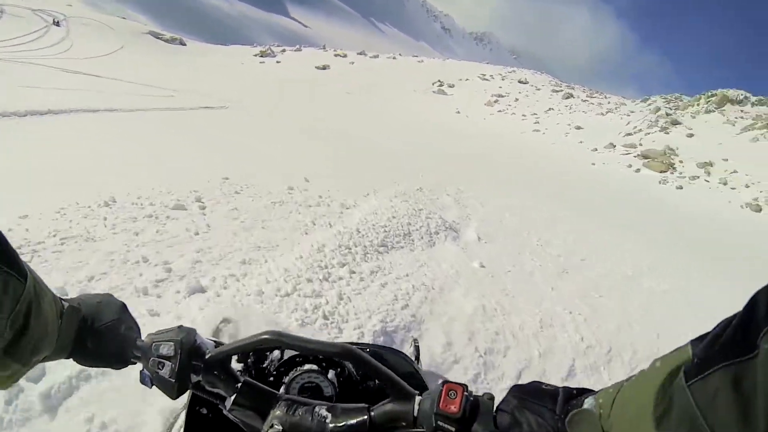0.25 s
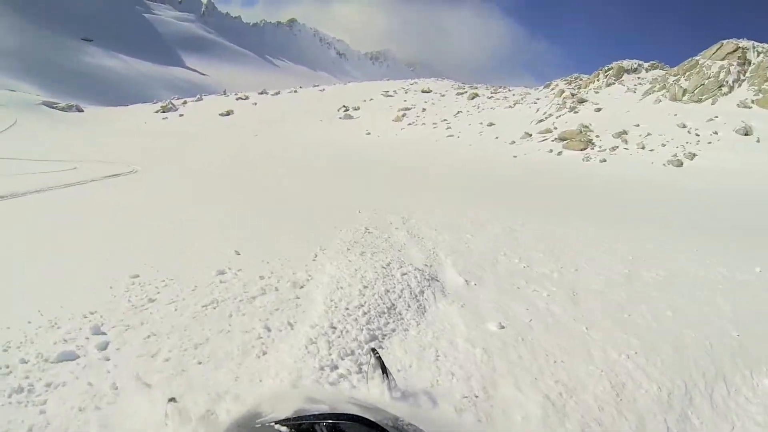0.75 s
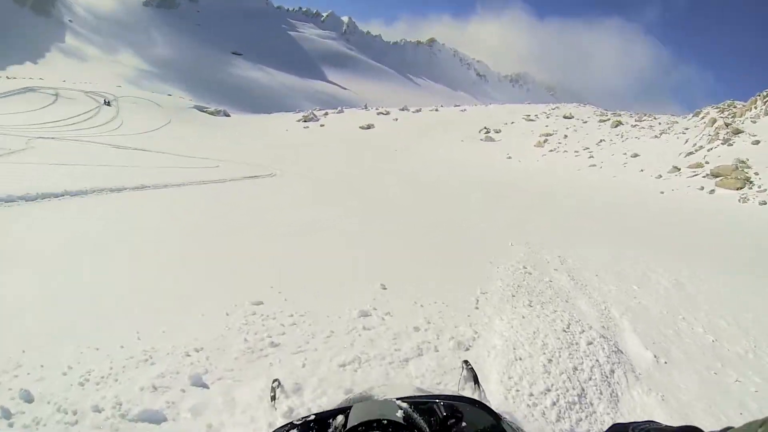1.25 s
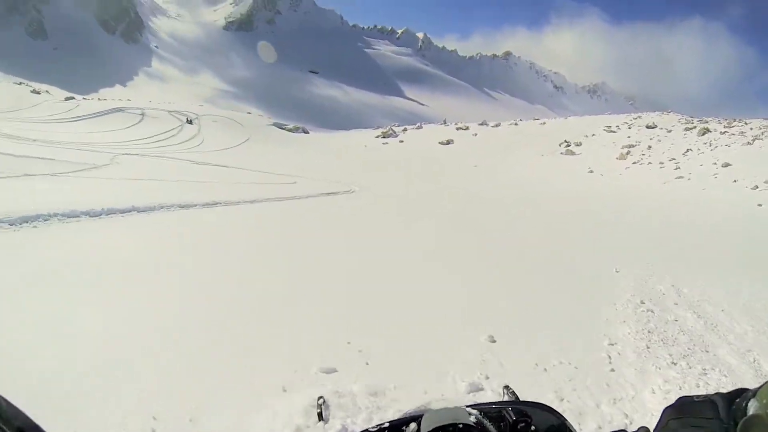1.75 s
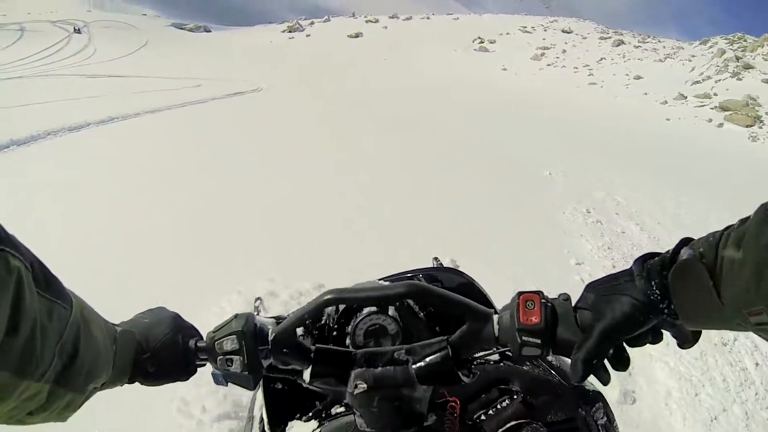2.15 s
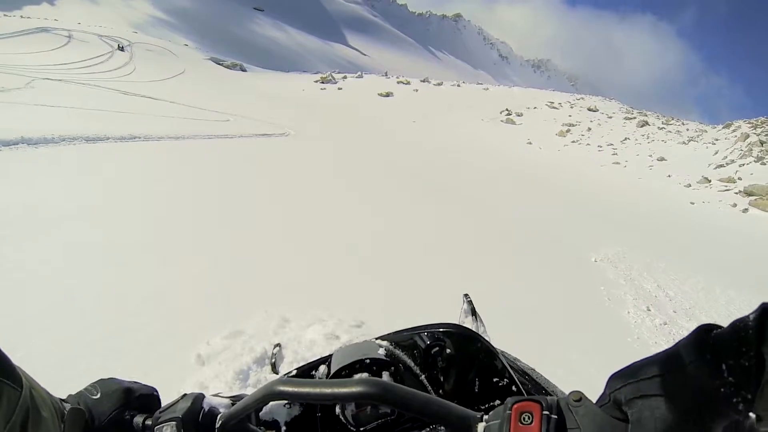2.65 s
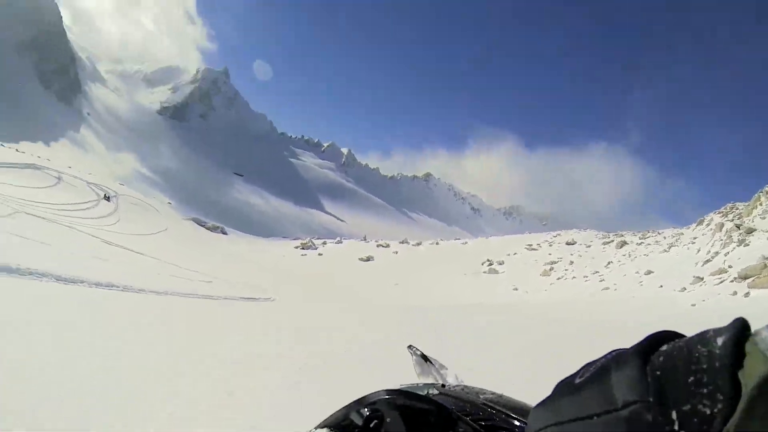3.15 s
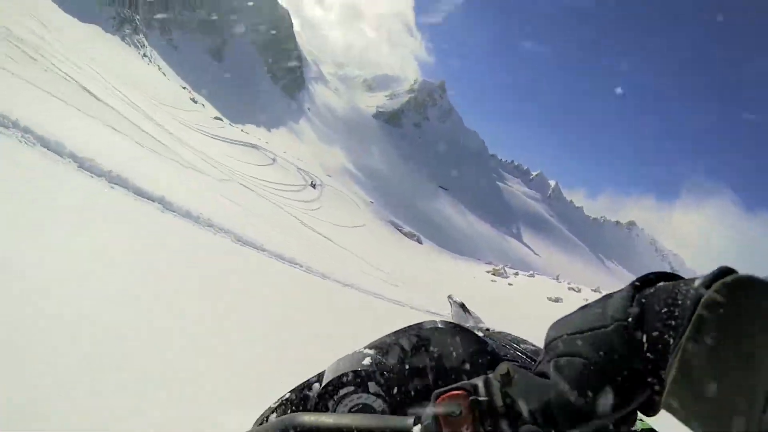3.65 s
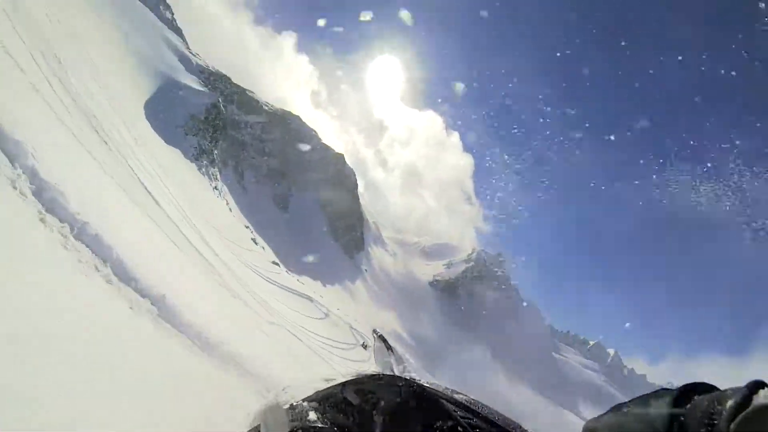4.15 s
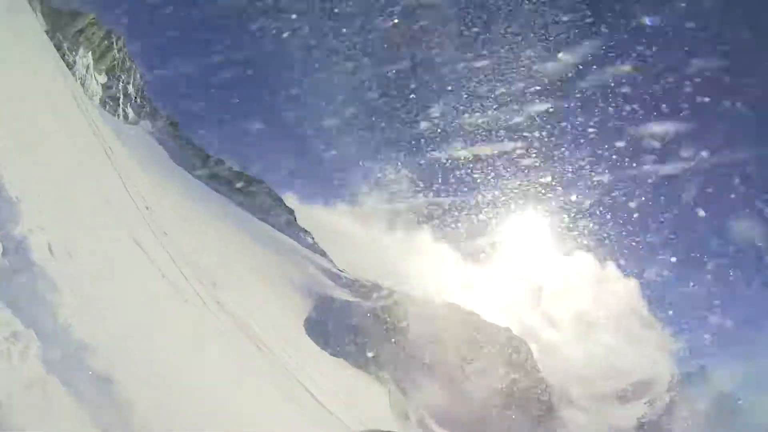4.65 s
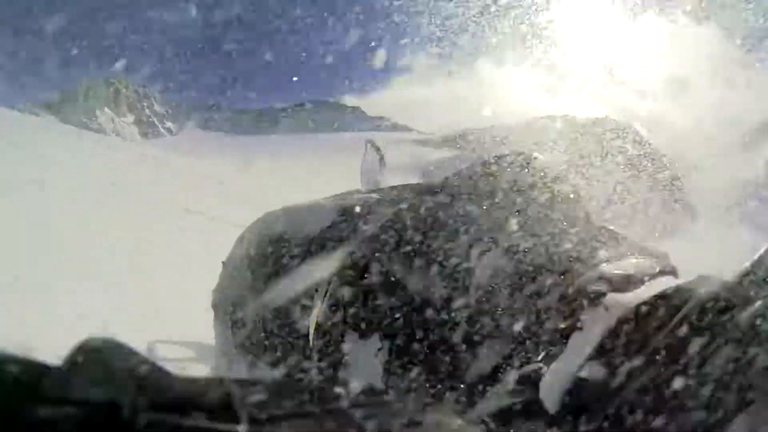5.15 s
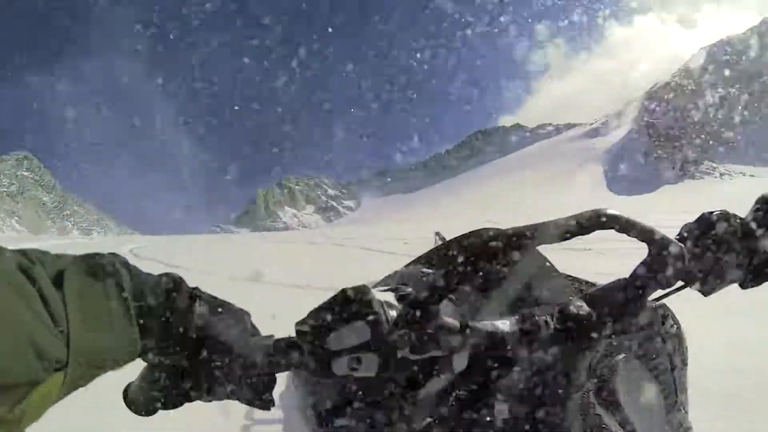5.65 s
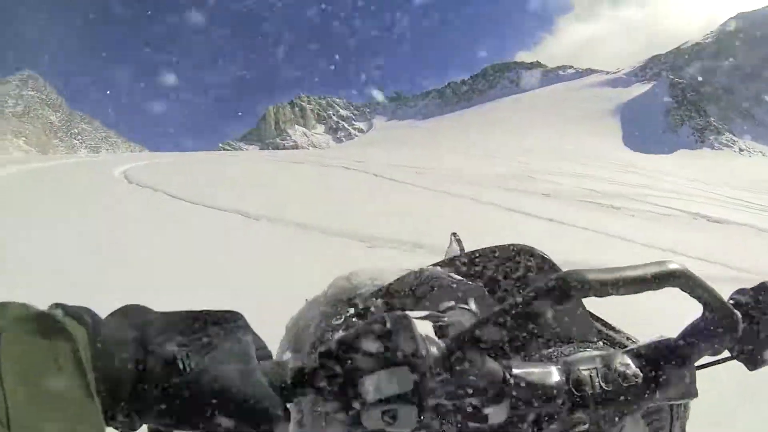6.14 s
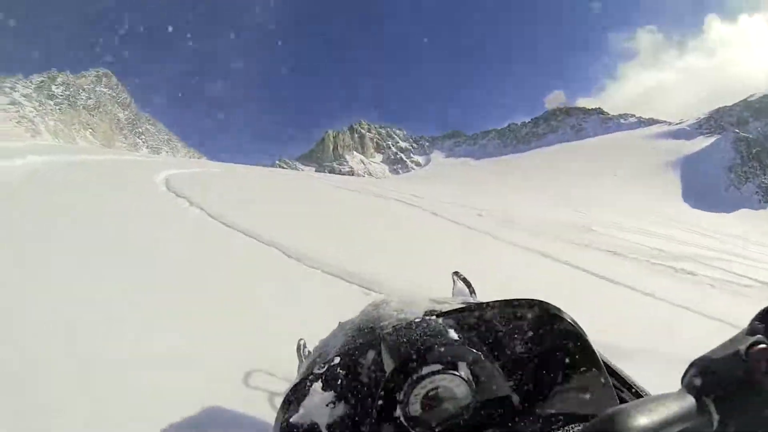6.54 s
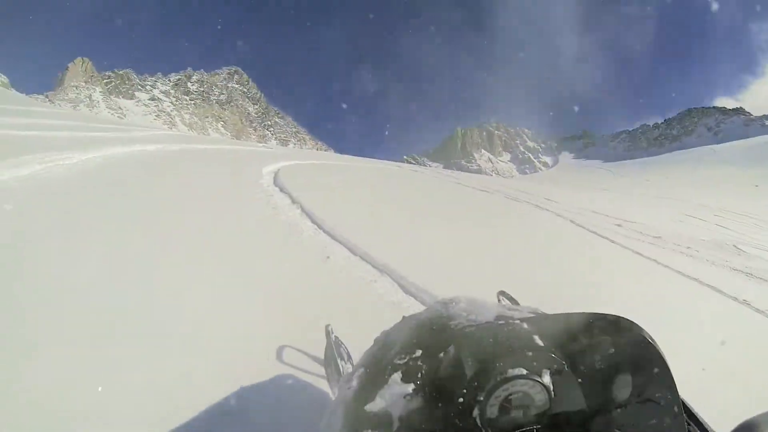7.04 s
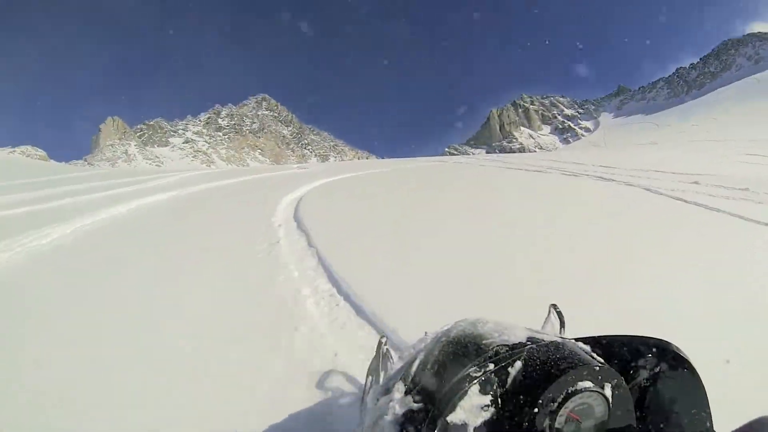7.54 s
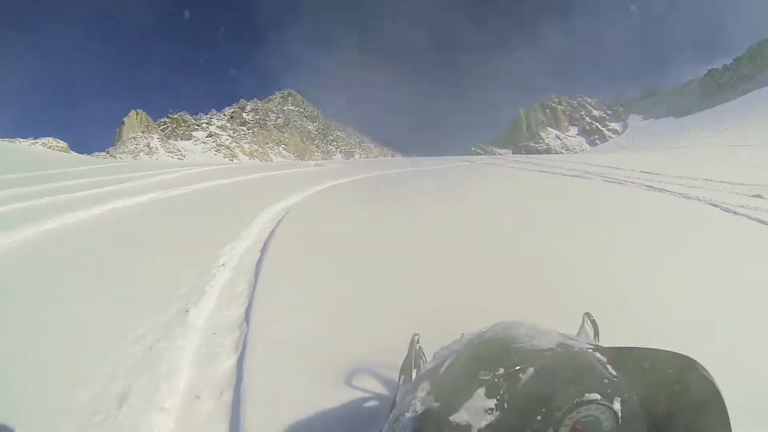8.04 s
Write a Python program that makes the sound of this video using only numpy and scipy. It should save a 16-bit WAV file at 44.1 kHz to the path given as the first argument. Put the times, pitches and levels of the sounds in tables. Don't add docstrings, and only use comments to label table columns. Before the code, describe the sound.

From 0 to 2.4 s a two-stroke twin idles quietly, an uneven low putter near 30 crank turns a second, beneath lumpy wind rumble. Dull knocks, faint glove rustle and small plastic clicks punctuate it, bunching at 2.0-2.36 s with a heavy thump at the end. At about 2.45 s the throttle opens; revs race upward until 3.3 s, sweeping through a boxy resonance near 1.5 kHz, with sharp hollow slaps around 2.8-2.9 s. Afterwards a loud, nasal, buzzing howl holds at high revs, sagging slightly near 5.7 s, then creeping up again. Fine snow hiss and spitting lumps thicken around 4.6-5.1 s, with breathy wind whistle and hollow slaps at 4.5-5.2 and 6.5-7 s. Low bumps land near 4.1-4.4, 5.1 and 5.5 s; track hum grows more present by 5.9 s. The close, sealed microphone softly overloads; the howl continues until an abrupt end at 8.3 s.

```python
import sys
import numpy as np
from scipy import signal
from scipy.io import wavfile
from scipy.ndimage import uniform_filter1d

SR = 44100
rng = np.random.default_rng(int(sys.argv[2]) if len(sys.argv) > 2 else 0)


def field_ratio(decibels):
    return 10 ** (np.asarray(decibels, dtype=float) / 20)


def int16_out(signal):
    q = np.round(np.clip(np.atleast_2d(signal).T, -1, 1) * 32767)
    wavfile.write(sys.argv[1], SR, q.astype(np.int16))


N = 365588
LOADED = np.clip((np.arange(N) / SR - 2.42) / 0.09063, 0, 1)


def evened(x):
    return x / np.sqrt(np.mean(x ** 2) + 1e-20)


def read(points, hz):
    f, value = np.transpose(points)
    return np.interp(np.log(hz + 1), np.log(f + 1), value)


def curves(rows):
    s, *columns = np.transpose(rows)
    return [np.interp(np.arange(N) / SR, s, c) for c in columns]


def wander(hz):
    coarse = rng.standard_normal(N // 64 + 2)
    smooth = signal.sosfiltfilt(signal.butter(2, hz, fs=SR / 64, output="sos"), coarse)
    return np.interp(np.arange(N) / 64, np.arange(len(coarse)), np.clip(evened(smooth), -2.5, 2.5))


def arches(rows, power):
    t = np.arange(N) / SR
    return sum(field_ratio(db) * np.sin(np.pi * np.clip((t - s) / length, 0, 1)) ** power for s, length, db in rows)


def colour(x, db_of):
    log_gain = np.log(field_ratio(db_of(abs(np.fft.fftfreq(8192, 1 / SR)))))
    response = np.fft.ifft(np.exp(np.conj(signal.hilbert(log_gain)))).real
    taps = response[:4096] * np.hanning(8192)[4096:]
    return signal.oaconvolve(x, taps / np.linalg.norm(taps))[:N]


def add(mix, s, sound):
    part = mix[round(s * SR):][:len(sound)]
    part += sound[:len(part)]


# pitch_hz, width_hz, level_db
CAVITY = [(1612, 255, -1), (1374, 360, -8.5), (2545, 580, -18), (3132, 500, -17.5), (4630, 350, -32),
          (5600, 640, -33), (7640, 470, -34), (10300, 1200, -48)]
# pitch_hz, level_db
SHELL = [(60, -54), (200, -11.5), (450, -22), (700, -20), (2000, -25), (4000, -33), (8000, -38),
         (12000, -69), (15000, -62)]


def housing(hz):
    modes = sum(field_ratio(2 * db) / (1 + (2 * (hz - f) / width) ** 2) ** 2 for f, width, db in CAVITY)
    return 10 * np.log10(modes + field_ratio(2 * read(SHELL, hz)))


# pitch_hz, level_db (per Hz)
GUST = [(7.1, -54), (12, 4.5), (32, -1.5), (75, -6.5), (115, -6.5), (133, -7), (152, -4), (216, -22),
        (400, -31), (520, -62), (880, -120)]
# start_s, length_s, level_db
GUSTS = [(.08, 0.44, -32.5), (1.17, .12, -32), (1.98, 0.46, -23), (2.96, 0.33, -23.5), (3.33, 0.23, -23.5),
         (3.75, 0.19, -25), (3.92, 0.1698, -24), (4.05, 0.61, -27.5), (4.5, 0.74, -29.5), (4.97, 0.18, -23),
         (5.38, 0.22, -21), (6.08, 0.1, -24), (6.35, 0.27, -31.5)]
LULL_DB, LULL_DB_PER_S = -30, -0.54


def wind():
    t = np.arange(N) / SR
    lumps = field_ratio(3.0 * wander(9.6))
    rumble = colour(lumps * rng.standard_normal(N),
                    lambda hz: read(GUST, hz) - 7.26 * np.log2(1 + (hz / 90) ** 4))
    roar_tone = [(40, -33.0), (100, -2.0), (200, -14.0), (500, -26.0), (1500, -38), (6000, -110)]  # (Hz, dB)
    roar = colour(lumps * rng.standard_normal(N), lambda hz: read(roar_tone, hz))
    blowing = np.hypot(field_ratio(LULL_DB + LULL_DB_PER_S * t), arches(GUSTS, power=0.35))
    roar_db = -8.5 - 1.4 * LOADED + 6.1 * np.exp(-t / 0.098)
    return blowing * (evened(rumble) + field_ratio(roar_db) * evened(roar))


# start_s, length_s, level_db
VENT = [
    (2.62, 0.37, -23.5),
    (4.1, 1.76, -28),
    (6.3, 0.96, -22),
]
VENT_CALM_DB = -49


def vent():
    air = field_ratio(2.0 * wander(45)) * rng.standard_normal(N)
    whistle = colour(air, lambda hz: -20 * np.log10(1 + ((hz - 1670) / 110) ** 2))
    return LOADED * np.hypot(field_ratio(VENT_CALM_DB), arches(VENT, power=1.0)) * evened(whistle)


# start_s, peak_db, pitch_hz
SLAPS = [(0.084, -31, 1450), (.112, -35, 1700), (.598, -34, 1580), (1.175, -35, 1630), (1.279, -30, 1636),
         (1.448, -31, 1637), (1.544, -30, 1640), (1.579, -40, 1615), (1.621, -29.5, 1640),
         (1.678, -31, 1650), (1.725, -30, 1637), (1.821, -35, 1624), (1.999, -29, 1626), (2.074, -29, 1603),
         (2.679, -25, 1690), (2.765, -20, 1600), (2.776, -13, 1660), (2.892, -7.5, 1524), (2.903, -9, 1530),
         (4.518, -11, 1700), (4.611, -6.5, 1720), (4.638, -14, 1770), (4.676, -9, 1720), (4.707, -12, 1610),
         (4.74, -11, 1705), (4.824, -21, 1660), (5.028, -9, 1675), (5.21, -11, 1690), (6.565, -9, 1625),
         (6.59, -11, 1680), (6.616, -6.5, 1630), (6.659, -8, 1627), (6.682, -15, 1660), (6.707, -10, 1610),
         (6.952, -19, 1630), (6.99, -10, 1624)]
SLAP_RISE_S, SLAP_T60_S = 0.0019, 0.063


def slaps():
    out, t = np.zeros(N), np.arange(3000) / SR
    rise = np.sin(np.pi / 2 * np.minimum(t / SLAP_RISE_S, 1)) ** 2
    shape = rise * field_ratio(-60 * np.maximum(t - SLAP_RISE_S, 0) / SLAP_T60_S)
    for s, db, hz in SLAPS:
        add(out, s, field_ratio(db) * shape * np.sin(2 * np.pi * hz * t))
    return out


# start_s, peak_db, pitch_hz, length_cycles, push (above 0) or pull (below 0)
KNOCKS = [(.103, -29.5, 200, 4, 1), (.222, -22, 140, 1.7, -1), (.288, -20.5, 100, 1.5, 1),
          (.325, -14, 40, 1.8, -1), (.452, -17, 38.16, 1.3, -1.1), (.098, -17.5, 23.7, 1.26, 1.2),
          (.145, -18, 25, 1, 1.2), (0.156, -22, 170, 1.2, -1), (1.176, -20, 120.6, 1.17, 1.45),
          (4.1, -16.5, 47.3, 3.8, 1), (4.299, -15, 44, 5.9, 0.94), (4.42, -16, 51.96, 4.4, 0.9),
          (1.732, -19.5, 109, 0.63, 1.4), (1.909, -17, 219, 0.78, -1.3), (0.236, -16, 31.6, 0.87, -1.7),
          (0.395, -14, 45.6, 0.82, 1.2), (0.882, -28, 90, 0.62, 1.2), (1.222, -21, 79.6, 0.45, -1.9),
          (1.399, -26, 51.53, 0.66, -1.2), (1.728, -9, 56, 1.1, 0.15), (1.908, -10, 51.07, 0.66, -0.5),
          (2.052, -12.5, 40.1, 1.04, 1), (2.131, -16, 101, 1.5, 0.94), (2.359, -2, 99, 1.12, 0.71),
          (5.088, -8.5, 50.4, 2, 0.71), (5.468, -7.5, 32.7, 1.5, 1)]
SWING_DB, SWING_HZ, SWING_T60_S = -18, 46, 0.15


def knocks():
    t = np.arange(N) / SR
    out = field_ratio(SWING_DB - 60 * np.minimum(t / SWING_T60_S, 5)) * np.cos(2 * np.pi * SWING_HZ * t)
    for s, db, hz, cycles, push in KNOCKS:
        turn = np.arange(int(SR * cycles / hz)) / SR * hz
        swell = np.sin(np.pi * turn / cycles) ** 0.85
        add(out, s, push * field_ratio(db) * np.sin(2 * np.pi * turn) * swell)
    return out


# start_s, peak_db, body_db, bright_db (shares of the click)
TICKS = [(0.076, -43, 11, -15), (.1544, -50, 10, -13), (.7205, -49, -8, -8), (1.178, -45, 11, -19),
         (1.2543, -36, 3, -18), (1.4484, -50, 0, -20), (1.492, -29.5, 6, -16), (1.5814, -41, 11, -25),
         (1.908, -31.5, 8, -33), (2.058, -43, 9, -28), (2.089, -38, 7, -11), (2.07, -31, 7.5, -24),
         (2.117, -29.5, -2, -15), (2.1927, -25, 11, -34), (2.2283, -40, 5, -19), (2.2425, -30.5, -1, -1),
         (2.2567, -34, 2, -9), (2.2933, -32, -5, -1), (2.3, -42, 0, 1), (2.3105, -45, -4, 3),
         (2.3206, -40, -5, 6), (2.331, -45, -2, 0), (2.3414, -43, -6, -2), (2.36, -29, -11, -3),
         (2.775, -32, 8, -15), (.657, -47, -6, -8), (2.03, -42, 2, -14), (2.249, -42, -3, 0),
         (2.296, -35, -2, 2), (2.316, -44, -3, 2), (4.6665, -24, -2, -7)]
# start_s, peak_db
LUMPS = [(3.6994, -36), (3.8494, -42), (4.6064, -26), (4.6658, -24), (4.7671, -34), (4.87, -33), (4.9, -32),
         (5.03, -32), (5.0744, -45), (5.3887, -31)]


def ticks():
    out, t = np.zeros(N), np.arange(900) / SR
    soft = 1 - np.exp(-t / .00025)

    def ring(hz, db, t60):
        return np.sin(2 * np.pi * hz * t) * field_ratio(db - 60 * t / t60)

    for s, db, body_db, bright_db in TICKS:
        click = ring(rng.uniform(2000, 3550), 0, 0.0092)
        click += ring(880, body_db - 4, 0.0078) + ring(CAVITY[0][0], body_db + 5.5, 0.012)
        for f, _, _ in CAVITY[4:]:
            upper_db = bright_db + 1.5 - 12 * (f > 9000) + 3 * rng.standard_normal()
            click += ring(f * rng.uniform(0.82, 1.04), upper_db, 0.0047)
        add(out, s, field_ratio(db + 2.0) * soft * click)
    for s, db in LUMPS:
        add(out, s, field_ratio(db - 3.0 - 60 * t / .006) * np.diff(rng.standard_normal(901)) / 2)
    return out


# pitch_hz, level_db
SPRAY = [(4500, -29), (7500, -6), (10500, 5.5), (12200, -1.5), (13500, -0.5), (15000, -13), (17000, -34.5)]
# start_s, length_s, level_db
PLUMES = [(3.45, 0.85, -59), (4.55, .2, -55), (4.7, 0.31, -51.5), (5.0, 0.11, -52), (5.9, .3, -63),
          (7.4, 0.3, -63)]
# time_s, throttle_db
LOAD = [(2.52, -50.5), (2.57, -51), (2.73, -35.5), (3.1, -30), (3.31, -35), (3.72, -32.5), (4.45, -34),
        (4.86, -31), (5.03, -31.5), (5.14, -34.5), (5.72, -34.5), (6.06, -31.5), (7.68, -32), (8.29, -33)]
SIFT_DB = -28


def spray():
    grains = field_ratio(1.9 * wander(80) + .6 * wander(9)) * rng.standard_normal(N)
    not_yet_db = -5 * np.clip((3.3 - np.arange(N) / SR) / .4, 0, 1)
    dust = LOADED * field_ratio(curves(LOAD)[0] + SIFT_DB + 3.0 + not_yet_db)
    level = field_ratio(-75.5) + np.hypot(dust, field_ratio(3.0) * arches(PLUMES, power=0.7))
    return level * evened(colour(grains, lambda hz: read(SPRAY, hz)))


# time_s, level_db
TRACK = [(2.9, -16), (3.0, -38), (3.17, -41), (4.12, -59), (5.86, -34.5), (8.29, -35.5)]


def track():
    tone = [(35, -17.0), (70, -1.0), (105, -12.5), (165, -25.0), (195, 2.5),
            (225, -26.0), (400, -63.5), (2000, -100)]
    hum = colour(rng.standard_normal(N), lambda hz: read(tone, hz))
    moving = np.clip((np.arange(N) / SR - 2.9) / 0.28, 0, 1)
    return moving * field_ratio(curves(TRACK)[0] + 2.5) * evened(hum)


# time_s, crank_hz (turns a second), rasp_db
IDLE = [(0, 32.6, -45.5), (.1, 32.3, -38), (.2, 31.6, -42), (.96, 32.28, -44.5), (1.6, 28.98, -43),
        (2.1, 30.68, -39.5), (2.29, 30.96, -37.5), (2.42, 35.28, -45)]
# time_s, crank_hz
CLIMB = [(2.45, 36.6), (2.524, 45.2), (2.628, 57.9), (2.73, 77.6), (2.748, 80.1), (2.852, 87.7),
         (3.032, 107.7), (3.164, 119), (3.294, 126.2)]
# time_s, crank_hz
HOLD = [(3.37, 127.3), (3.51, 127.4), (3.88, 125.7), (4.19, 127), (4.52, 125), (4.81, 126.6), (5.24, 122.1),
        (5.51, 122), (5.74, 117.2), (5.94, 117.8), (6.2, 119.8), (6.36, 118.6), (6.56, 120.6),
        (7.09, 122.3), (7.58, 122.8), (7.77, 124.5), (7.97, 123.7), (8.2, 125.2)]


def crank():
    hz = (1 - LOADED) * curves(IDLE)[0] + LOADED * curves(CLIMB + HOLD)[0]
    return hz, np.cumsum(hz * (1 + 0.00075 * wander(28.0))) / SR


# start_s, length_s, level_db (beside the idle rasp's high band)
GRABS = [
    (.05, 0.53, -14),
    (2.06, 0.049, 1),
    (2.225, 0.052, 2),
    (2.288, 0.045, 5),
]
IDLE_HIGH_DB = -22.5
CAVITY_RASP_DB, OPENING_S, OPENING_DB = 9.5, 2.57, 9.5


def rasp(turns):
    idle_db, throttle_db, t = curves(IDLE)[1], curves(LOAD)[0], np.arange(N) / SR
    idle_high_db = IDLE_HIGH_DB + 20 * np.log10(1 + arches(GRABS, power=.6))
    cavity_db = CAVITY_RASP_DB + OPENING_DB * np.exp(-((t - OPENING_S) / 0.052) ** 2)
    firing = 2 * turns
    stroke = firing.astype(int)
    uneven_db = (2.0 - 1.0 * LOADED) * rng.standard_normal(stroke[-1] + 2)[stroke]
    strength = field_ratio(uneven_db - (4.5 - 3.2 * LOADED) * (stroke % 2))
    puff = strength * np.exp(-(firing % 1) / (.9 - 0.25 * LOADED))
    puffs = evened(0.8 + 0.13 * LOADED + puff) * rng.standard_normal(N)
    rung = evened(colour(puffs, housing))

    def band(hz, kind, idle, load):
        sos = signal.butter(4, hz, kind, fs=SR, output="sos")
        return evened(signal.sosfilt(sos, rung)) * field_ratio((1 - LOADED) * idle + LOADED * load)

    high_db = throttle_db - 7.5 - 5.3 * np.clip((3.3 - t) / 0.35, 0, 1)
    return (band(2000, "low", idle_db + 0.33, throttle_db + cavity_db)
            + band((2000, 4000), "band", idle_db - 10.5, throttle_db + 2.0)
            + band((4000, 11500), "band", idle_db + idle_high_db, high_db))


# start_s, length_s, level_db
PICKUP = [
    (2.2, 0.4, -51.5),
]


def idle_throb(turns):
    orders = [(1, -42), (4, -40.5), (8, -53.5), (12, -56)]  # (order, dB)
    tones = 0
    for k, db in orders:
        tones = tones + field_ratio(db + 2.0 * wander(19) + 2.0 * wander(0.8)) * np.cos(2 * np.pi * k * turns)
    idling = (1 - LOADED) * np.clip((np.arange(N) / SR - .3) / .3, .1, 1)
    pickup = arches(PICKUP, power=.7) * np.cos(24 * np.pi * turns)
    return np.sqrt(2) * (idling * tones + pickup)


# pitch_hz, level_db (over throttle)
SECOND = [(85, 8), (100, 23), (135, 18), (160, 4), (215, 5), (238, 11), (247, 11), (258, 16)]
THIRD = [(130, -14), (180, -10), (215, -6), (240, -4), (270, -7), (345, 5), (360, 4), (380, 1)]
FOURTH = [(170, 4), (260, 2), (320, 9), (410, 12.5), (470, 5), (495, -3.5), (504, -13)]
TWELFTH = [(900, -24), (1200, -11), (1400, 3), (1435, 4.5), (1465, 4), (1495, 11), (1530, 10.5)]
THIRTEENTH = [(900, -23), (1300, -1), (1480, 11.5), (1545, 8), (1585, 7), (1640, 9)]
# pitch_hz, level_db (over throttle)
PIPE = [(120, -9), (330, 13.5), (450, -16), (600, -14), (900, -15.5), (1250, -8.5), (1550, 10.5),
        (1900, -12.5), (2300, -7), (2700, -16.5), (3150, -11.5), (4000, -26), (6000, -27)]
# pitch_hz, width_hz, level_db
RINGS = [
    (4620, 150, 0),
    (5370, 120, 4),
]
# (start_s, length_s, level_db)
SWELLS = [dict(order=2, at=[(2.84, 0.093, -22.5), (3.05, 0.19, -17.5), (4.0, 0.92, -20),
          (6.25, 0.4, -19.5)]), dict(order=5, at=[(2.66, .14, -35), (2.88, .06, -40), (3.1, .08, -33),
          (5.75, .4, -41)]), dict(order=3, at=[(6.1, 0.35, -25.5), (7.2, 0.62, -25), (7.8, .6, -27)]),
          dict(order=4, at=[(3.3, 0.43, -36.5), (3.95, 0.32, -38), (4.92, 1, -32), (7.8, .6, -35.5)]),
          dict(order=6, at=[(2.5, 0.33, -32), (2.8, 0.45, -41), (6.2, 0.7, -44.5), (8.05, 0.31, -40.5),
          (3.7, 0.73, -42.5), (4.35, 0.71, -34), (5.8, 0.53, -44.5)]), dict(order=7, at=[(6.12, 4.2, -43),
          (4.4, 0.11, -43), (4.3, 0.501, -47), (3.1, 0.35, -42)]), dict(order=8, at=[(2.5, 0.17, -38.5),
          (2.75, .36, -39.5), (2.95, 0.17, -35.5), (3.2, 1.5, -38.5), (3.75, 0.51, -33),
          (4.95, 0.28, -37.5), (5.7, .5, -38.5), (6.42, 4.13, -40)]), dict(order=9, at=[(3.13, .1, -31),
          (3.1, 0.97, -37.5), (4.8, 0.47, -39.5), (4.1, .7, -45), (7.3, 1.1, -40)]),
          dict(order=10, at=[(2.75, .12, -40), (3.12, 0.23, -30.5), (3.3, 1.1, -33.5), (7.05, 0.29, -25),
          (7.8, 0.58, -27), (5.15, 4.5, -30)]), dict(order=11, at=[(3.32, 0.95, -28), (4.49, .68, -32),
          (6.56, 2, -34)])]
# (start_s, length_s, level_db)
HOWLS = [dict(order=12, at=[(2.98, .07, -26.5), (3.21, 0.061, -6), (3.56, 0.75, -17), (4.84, 0.15, -15),
         (4.8, 0.49, -20), (5.38, 0.22, -18), (7.33, 1, -17), (8.0, .4, -14)]),
         dict(order=13, at=[(2.8, .15, -41), (5.55, 0.57, -23), (4.78, 0.55, -20.5), (6.4, 0.57, -17),
         (6.9, 1.22, -20), (7.3, 0.59, -17)]), dict(order=14, at=[(2.78, 0.11, -30.5), (3.06, 0.13, -16),
         (3.75, 1.04, -30.5), (5.2, 0.14, -19.5), (5.55, 1.3, -29.5), (7.3, 0.28, -26),
         (8.05, 0.24, -25.5)]), dict(order=15, at=[(2.76, 0.089, -30), (3.2, 0.7, -32), (6.2, 1, -36),
         (4.3, 0.97, -33.5), (5.66, 0.29, -25), (7.61, 0.71, -28.5)]), dict(order=16, at=[(5.69, 0.75, -33),
         (5.05, 0.28, -36), (7.05, 0.23, -40)]), dict(order=17, at=[(2.8, 0.12, -21), (3.37, .58, -37.5),
         (4.72, 0.26, -32.5)]), dict(order=18, at=[(2.74, .14, -19.5), (3.8, .4, -38), (4.9, 0.63, -37.5),
         (6.1, 1.06, -40), (4.28, 0.55, -32), (7.97, 0.34, -31.5)]), dict(order=19, at=[(4.96, 0.43, -31.5),
         (5.71, .83, -36.5), (6.83, 0.74, -33.5), (6.25, .3, -30.5), (7.8, .25, -35.5)]),
         dict(order=20, at=[(3.3, 0.18, -35), (3.65, 0.45, -33), (4.3, 0.51, -38), (5.3, .25, -38),
         (5.8, .25, -39), (6.3, 0.34, -40), (7.75, 0.41, -37.5)])]
# (start_s, length_s, level_db)
WHINES = [dict(order=21, at=[(5.2, 0.13, -32.5), (4.05, 0.83, -45), (5.8, .75, -38.5), (7.55, .8, -40)]),
          dict(order=23, at=[(5.8, .25, -42), (6.3, 0.57, -43), (7.25, .3, -42)]),
          dict(order=24, at=[(3.5, 0.33, -40), (7.8, .5, -41)]), dict(order=29, at=[(6.05, .25, -44),
          (7.3, 0.98, -44.5)]), dict(order=22, at=[(4.3, .5, -41.5), (6.05, 0.23, -41)]),
          dict(order=25, at=[(3.8, 0.88, -39), (4.8, .25, -43), (7.05, 1, -43)]),
          dict(order=28, at=[(4.8, 0.28, -43), (6.8, 0.47, -43)]), dict(order=32, at=[(4.55, .5, -46.5)]),
          dict(order=36, at=[(3.9, 0.43, -51), (4.55, 0.65, -50), (7.8, 0.55, -57)]),
          dict(order=38, at=[(5.87, 0.3, -46.5), (5.3, .25, -49), (6.8, 1, -54)]),
          dict(order=26, at=[(3.55, 0.39, -36.5), (4.7, 0.39, -37.5), (6.39, 0.73, -52)]),
          dict(order=27, at=[(5.73, 1.08, -53)]), dict(order=44, at=[(3.75, 0.27, -51), (4.25, 0.5, -49.5),
          (4.94, 0.13, -43), (8.0, 0.28, -50)])]


def exhaust(hz, turns):
    throttle_db, t = curves(LOAD)[0], np.arange(N) / SR
    named = {2: SECOND, 3: THIRD, 4: FOURTH, 12: TWELFTH, 13: THIRTEENTH}
    revving = np.clip((3.3 - t) / 0.68, 0, 1)
    out = np.zeros(N)
    for k in range(1, 50):
        pitch, drift = k * hz, wander(5.9)
        if k in named:
            order_db = read(named[k], pitch) + 0.45 * drift
        else:
            order_db = 4.6 * revving * np.exp(-((pitch - 1560) / 230) ** 2) * (t > 2.66)
            order_db += revving * (-9 * (k in (5, 7, 9, 11)) - .55 * max(k - 14, 0))
            order_db += sum(db / (1 + ((pitch - f) / width) ** 2) for f, width, db in RINGS)
            drift_db = min(0.37 * k, 2.6) + min(0.18 * max(k - 16, 0), 2.2)
            order_db += read(PIPE, pitch) + drift_db * drift
        level = field_ratio(throttle_db + order_db)
        for s, length, db in (row for one in SWELLS + HOWLS + WHINES if one["order"] == k for row in one["at"]):
            edge = np.clip(np.minimum(t - s, s + length - t) / 0.13 + .5, 0, 1)
            level = np.maximum(level, field_ratio(db + 0.059 * k) * edge)
        depth = min(.06 + .01 * k, .13) + .3 * revving * (k > 10)
        flutter = 1 + depth * (wander(30) + .6j * wander(30))
        tone = flutter * np.exp(2j * np.pi * (k * turns + rng.random()))
        out += np.sqrt(2) * level * tone.real
    return LOADED * out


# start_s, length_s, pitch_hz, width_hz, level_db
HOLLOWS = [(2.4, 0.24, 710, 400, 2), (3.092, 0.75, 2807, 150, -0.5), (3.2, 1.3, 3750, 250, -3.5),
           (3.2, 0.81, 5500, 760, -3.5), (4.5, 1.4, 2964, 140, -2.5), (5.5, .6, 2030, 100, -4),
           (5.2, 3.3, 7500, 1400, -3), (7.45, 0.7, 2723, 150, -5), (7.2, 0.44, 2240, 150, 0.5),
           (4.7, .4, 3430, 220, 1.5), (7.7, 0.58, 620, 56, -5), (3.15, .2, 4700, 150, -8),
           (2.55, 0.17, 870, 110, -3)]
# pitch_hz, width_hz, level_db
VALLEYS = [
    (1180, 130, -1.5),
    (2043, 120, -3),
    (2166, 117, 2),
    (2930, 127, -1.5),
    (4190, 180, -2),
]
RIPPLE_DB = 2.2


def shifting_bands(x):
    hz, t, z = signal.stft(x, SR, nperseg=1024, boundary="even")
    hz = hz[:, None]

    def bump(f, width, db):
        return db * np.exp(-((hz - f) / width) ** 2)

    db = sum(bump(f, width, depth_db) * np.sin(np.pi * np.clip((t - s) / length, 0, 1)) ** .5
             for s, length, f, width, depth_db in HOLLOWS)
    db = db + sum(bump(*row) for row in VALLEYS) * (t > 2.45)
    chance = uniform_filter1d(rng.standard_normal(z.shape[::-1]), size=12, axis=0)
    ripple = evened(uniform_filter1d(chance, size=3, axis=1)).T
    db = db + RIPPLE_DB * ripple * np.clip(hz / 2500 - 1, 0, 1)
    return signal.istft(z * field_ratio(db), SR, nperseg=1024)[1][:N]


def scene():
    hz, turns = crank()
    engine = exhaust(hz, turns) + idle_throb(turns) + rasp(turns)
    hum, dust = track(), spray()
    close = wind() + vent() + knocks() + ticks() + slaps()
    return (shifting_bands(engine + dust) + hum + close)[None]


def low_pass(x):
    return signal.sosfilt(signal.butter(12, 15190, fs=SR, output="sos"), x)


def record(dry):
    overloaded = 1.158 * np.tanh(dry / 1.19)
    fade = np.minimum(np.arange(N)[::-1] / 60, 1)
    return low_pass(overloaded * fade)


dry = scene()
out = record(dry)
int16_out(out)
```